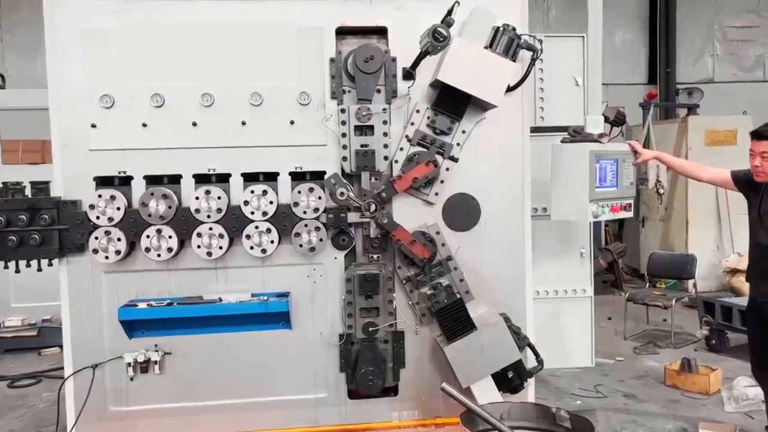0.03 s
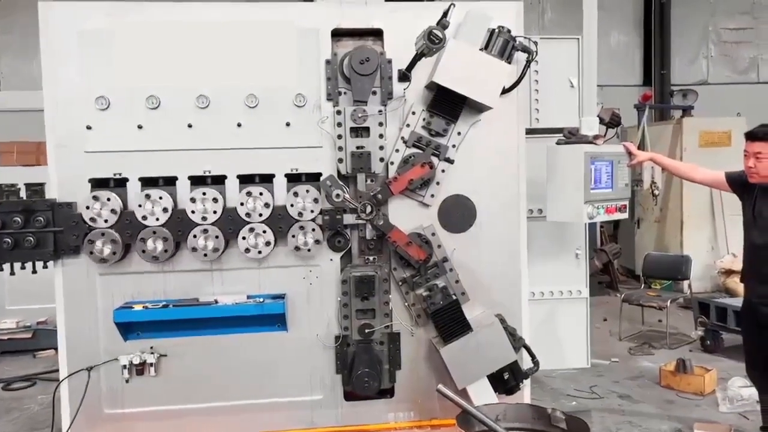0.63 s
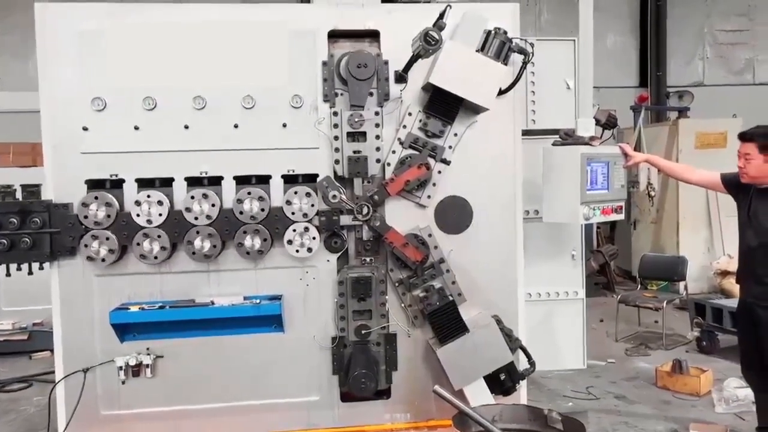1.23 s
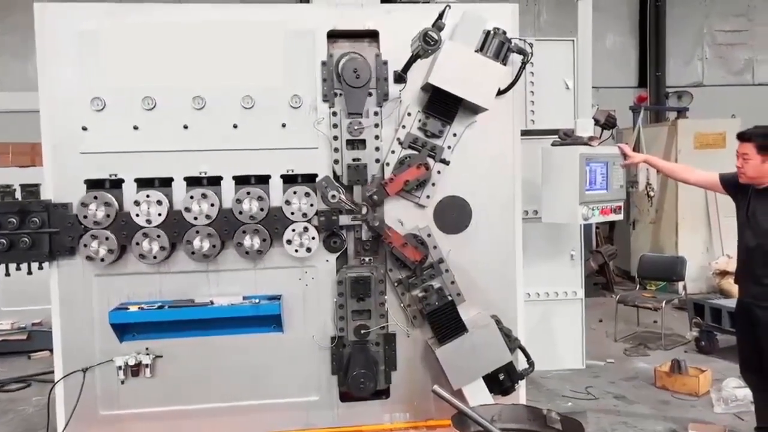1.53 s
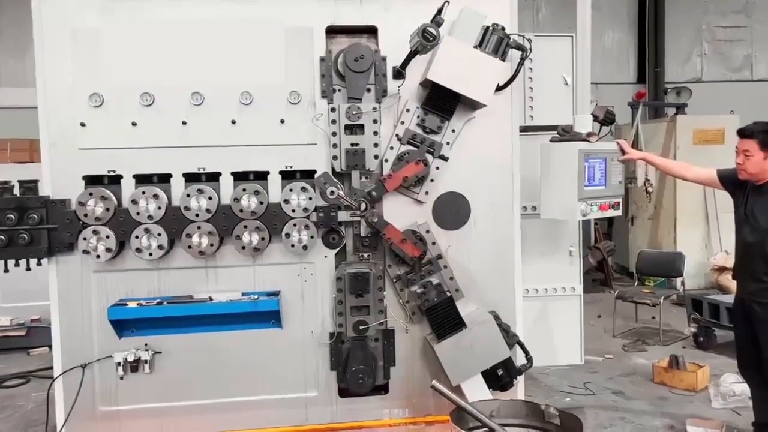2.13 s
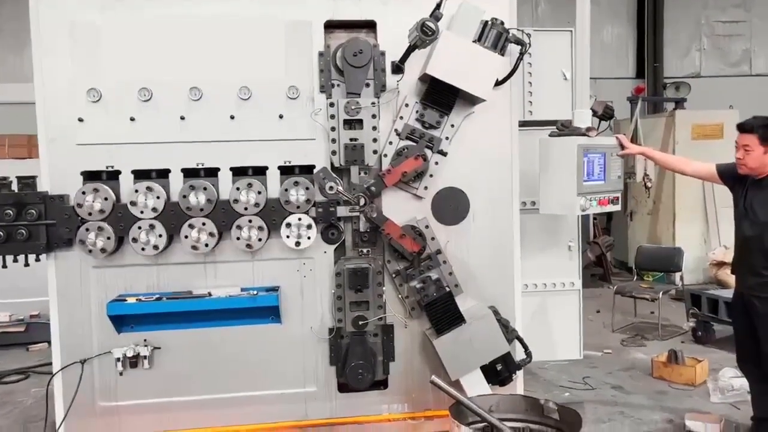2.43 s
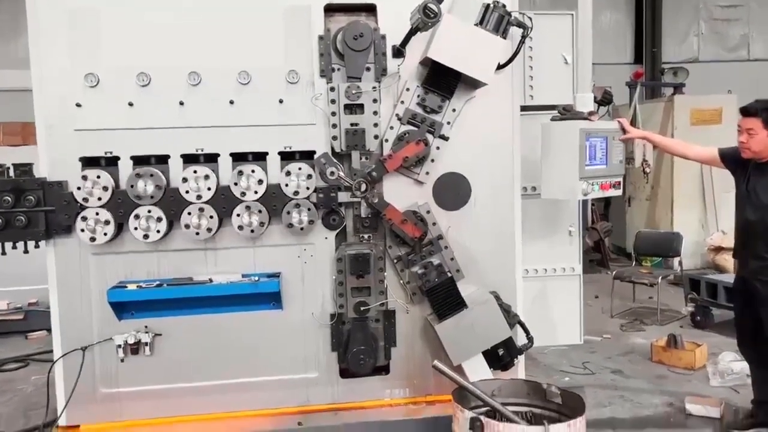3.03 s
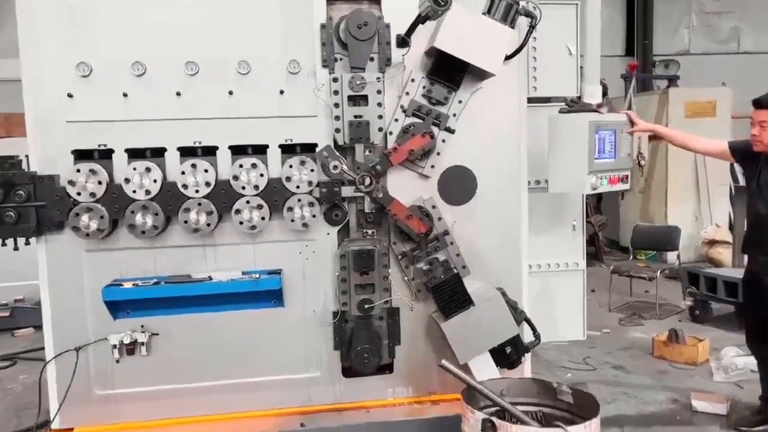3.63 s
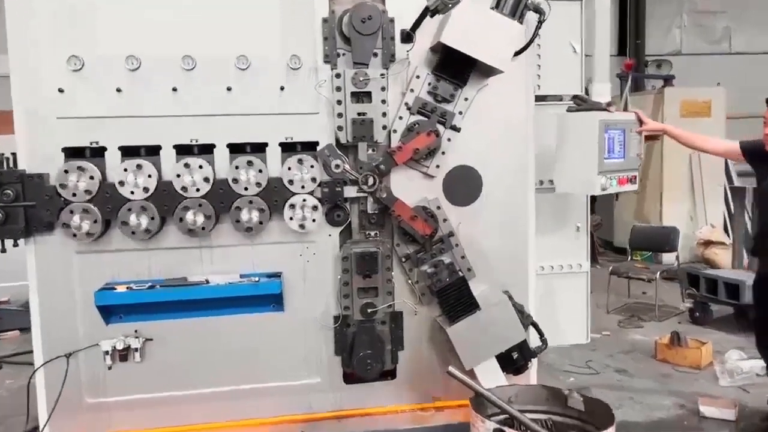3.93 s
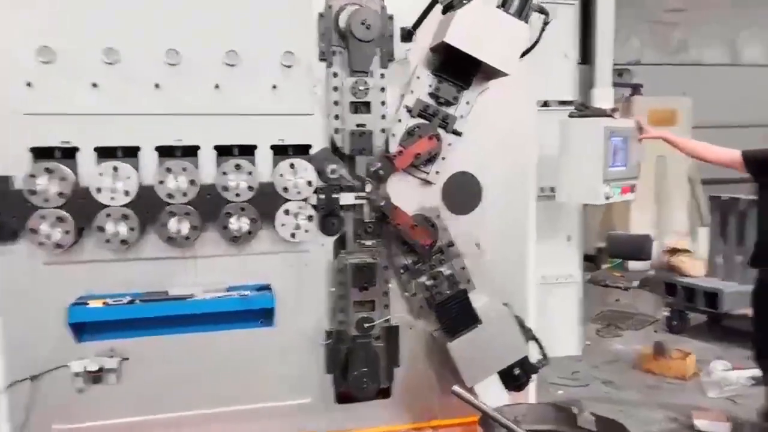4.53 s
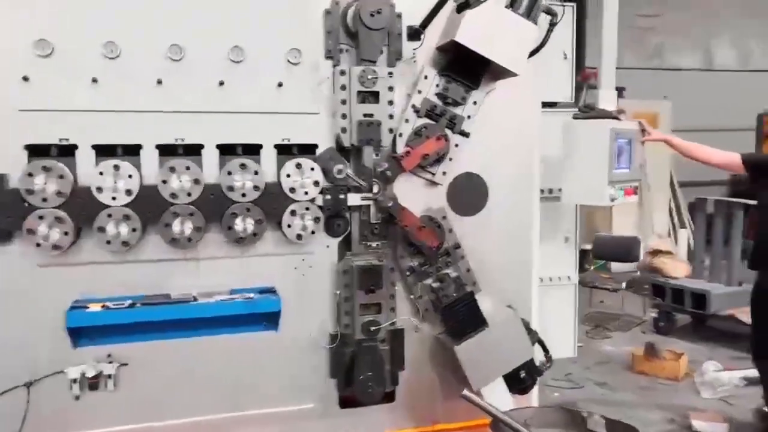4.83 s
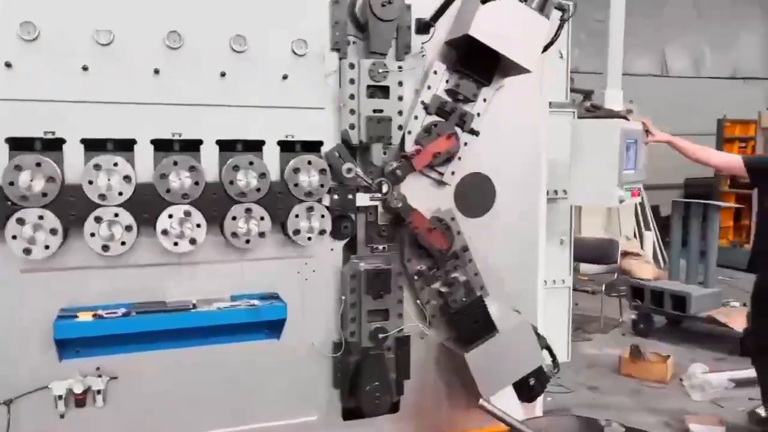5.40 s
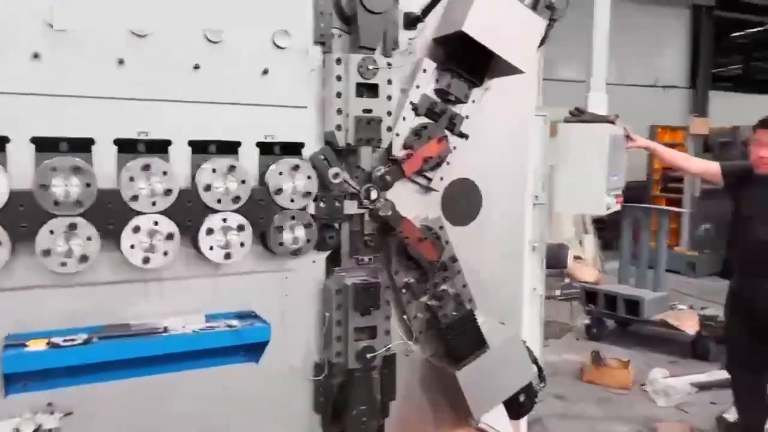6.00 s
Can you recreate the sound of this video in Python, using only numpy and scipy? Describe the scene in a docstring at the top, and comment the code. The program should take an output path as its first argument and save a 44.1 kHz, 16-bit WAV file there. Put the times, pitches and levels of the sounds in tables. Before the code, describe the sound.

A spring coiling machine twice snaps heavy wire with a booming crack, each spring clattering into a steel drum over a low workshop hum.

```python
"""A spring coiling machine cuts off two heavy springs in a large workshop.
In each cycle the rollers feed wire, the cutter runs in, bites the wire and snaps it with a crack that
sets the frame booming. The freed spring drops into a steel drum, where it bounces and rings, each
landing with its own clank. The hall answers every blow; underneath, the drives hum and whistle."""
import sys
import numpy as np
from scipy import signal
from scipy.fft import rfft, irfft
from scipy.io import wavfile
from scipy.ndimage import uniform_filter1d, map_coordinates

SR = 44100
rng = np.random.default_rng(int(sys.argv[2]) if len(sys.argv) > 2 else 0)


def pcm_store(signal):
    """Save signal as 16-bit PCM."""
    levels = np.round(np.clip(np.atleast_2d(signal), -1, 1) * 32767)
    wavfile.write(sys.argv[1], SR, levels.astype(np.int16).T)


N = 276066
T = np.arange(int(1.5 * SR)) / SR  # seconds since a blow

# cutter strokes, with base levels for their layers; lying is how the spring falls (0 on end, 1 on side):
# snap_s, drive_db, bite_db, crack_db, frame_db, lying
STROKES = [(1.4394, -44.5, -22.5, -7.5, -18.5, 0.32), (4.2863, -46, -24, -6.5, -19, 0.89)]
# the machine frame's boom: pitch_hz, t60_s, level_db
FRAME_MODES = [(53.8, 1, -7.5), (70.7, 0.46, 2), (112.1, 0.24, 0), (174.3, 0.13, 5.5), (228.4, 0.3, -18.5),
               (354, 0.15, -10.5)]
# tone colours of the gear whir, the bite, the panels and the high ring that shudders after the snap:
# frequency_hz, level_db
DRIVE_COLOUR = [(70, 10.5), (180, 0.5), (400, 2.5), (900, -2), (1250, 1), (1500, 0), (1700, -8.5),
                (1900, -5), (2500, -8.5), (3500, -16.5), (5000, -26), (11000, -35.5)]
BITE_COLOUR = [(50, -17.5), (240, 8), (600, 5), (1300, 4.5), (1900, -1.5), (2900, -3), (4000, -16.5),
               (8000, -28.5), (12000, -35.5)]
PANEL_COLOUR = [(110, -7), (200, -6.5), (300, 1), (500, 1.5), (800, -5.5), (1200, -4), (1650, -10.5),
                (2400, -7), (3700, -20.5), (7500, -21.5), (12000, -34)]
SHUDDER_COLOUR = [(800, -19), (3000, -1), (4500, 0), (6000, -11.5), (7300, -1.5), (8300, -13.5), (9100, -0.5),
                  (10200, -11), (12000, -21)]
# the spring's landings: start_s, drum_db, spring_db, chatter_s, tilt_db_per_octave, clank_hz, clank_db
LANDINGS = [ (1.862, -14.5, -18, 0.0064, 0.5, 3083, -23.5), (1.877, -16.5, -29, 0.0031, 0, 1400, -34),
            (1.892, -20, -39, 0.013, -1.5, 1520, -32), (1.981, -21, -26.5, 0.013, -1.5, 517, -26),
            (2.032, -20, -27.5, 0.003, -3, 1490, -27.5), (2.084, -25, -20.5, 0.0085, 0.5, 4330, -29),
            (2.101, -34, -25, 0.0022, 3.5, 4210, -26), (2.144, -26, -34, .012, -3.5, 1170, -38.5),
            (2.179, -32.5, -21.5, 0.0045, 0, 4700, -25), (2.246, -40, -30, 0.0039, 3.5, 4650, -42),
            (2.284, -50, -59, 0.0049, -7, 2730, -46), (2.493, -47, -45.5, .004, 0.5, 4800, -45.5),
            (2.527, -53.5, -48.5, 0.0042, -0.5, 3440, -53), (2.582, -48.5, -51, 0.0027, -1, 2110, -53),
            (4.791, -16, -17.5, 0.009, -3, 2870, -27.5), (4.817, -25, -18, 0.0064, 0.5, 7740, -27.5),
            (4.829, -16.5, -20.5, 0.0067, 4, 1323, -22.5), (4.848, -24.5, -25.5, 0.0051, -4.5, 1330, -31.5),
            (4.9, -30.5, -40.5, 0.02, 2.5, 3270, -33), (4.988, -52.5, -44, 0.0039, 4, 3000, -42),
            (5.069, -32, -30.5, 0.0049, -2.5, 2080, -30.5), (5.128, -44.5, -32, 0.0083, -4.5, 4370, -32.5),
            (5.297, -63, -58, 0.0039, -5, 5900, -58)]
# the ring of the spring and of the drum, by how the spring lands: pitch_hz, t60_s, on_end_db, on_side_db
SPRING_MODES = [ (1363, .14, -18, -7), (1966, .12, -18, -10), (2928, .17, -9, -3), (3258, .12, -3, -12),
                (3790, .11, -14, -7), (4032, .15, -7, -10), (4140, .08, -4, -9), (4260, .08, -4, -9),
                (4420, .13, -5, -7), (4550, .1, -6, -16), (4722, .1, -5, -20), (4953, .13, -6, -14),
                (5222, .12, -10, -10), (5526, .15, -8, -25), (5868, .22, -7, -.5), (6330, .15, -7, -16),
                (6646, .13, -8, -12), (7025, .2, -10, -12), (7321, .12, -8, -10), (7434, .12, -8, -9),
                (7530, .2, -8, -3), (7608, .2, -13, -2.5), (7809, .2, -13, -4), (8160, .2, -15, -16),
                (8742, .25, -11, -11), (9065, .25, -11, -8), (9150, .25, -13, -5), (9340, .2, -12, -9),
                (9550, .2, -11, -9), (10020, .09, -12, -12), (10240, .09, -10, -13), (10332, .1, -15, -9),
                (10760, .1, -14, -13), (11520, .12, -12, -9)]
DRUM_MODES = [ (340, .15, -7, -12), (498, .25, -5, -14), (540, .25, -5, -14), (1019, .15, -8, -7),
              (1267, .15, -9, -1), (1320, .08, -7, -3), (1385, .1, -4, -3), (1458, .2, -1, -2),
              (1518, .18, -1, -3), (1562, .2, -1, -7), (1617, .16, -4, -9), (2225, .12, -5, -7),
              (2329, .12, -8, -3), (2474, .2, -5, -2), (2713, .15, -5, -7), (2960, .2, -4, -3),
              (3050, .2, -3, -2), (3140, .2, 0, -5), (3240, .2, 0, -3), (3474, .15, -6, -4)]
# crowds of close modes in the coils and in the drum's sheet steel: frequency_hz, level_db
COIL_COLOUR = [(300, -20.5), (1500, -6.5), (2800, -0.5), (4400, 4.5), (5400, -3), (7300, -1.5), (8400, -16),
               (9200, -8.5), (11500, -9.5), (13000, -33)]
SHEET_COLOUR = [(60, -26), (170, -5.5), (450, -3.5), (800, -2), (1450, 5.5), (1800, -2.5), (2400, 1.5),
                (3300, -0.5), (4800, -12.5), (8000, -15.5), (12000, -20)]
# single modes that a square landing leaves singing: start_s, pitch_hz, t60_s, level_db
SINGING_MODES = [(1.866, 345, 0.091, -22.5), (1.866, 2660, 0.07, -24), (1.890, 520, 0.095, -29.5),
                 (1.865, 1340, 0.048, -21), (2.086, 2988, 0.22, -33), (2.088, 4310, 0.085, -20.5),
                 (2.087, 4953, 0.06, -31), (2.088, 8161, 0.23, -32.5), (2.088, 9140, 0.16, -30.5),
                 (2.181, 3238, 0.1, -33), (2.182, 4600, 0.055, -31), (2.181, 9000, .14, -33),
                 (4.829, 2530, 0.13, -28), (4.835, 1305, 0.055, -20), (4.852, 1375, 0.053, -22.5),
                 (5.072, 1318, .12, -37), (5.073, 2870, 0.21, -39), (5.073, 7750, .22, -35),
                 (5.073, 5860, 0.22, -36), (5.135, 5880, .18, -43)]
# slaps off the roof and walls; the far ones return only bass: delay_s, level_db, cutoff_hz
ECHOES = [(.045, -12.5, 897), (.076, -10.5, 695), (.14, -11.5, 300), (.203, -4.5, 220), (.262, -11.5, 260),
          (0.334, -5.5, 119.5)]
# the room tone of fans and motors: frequency_hz, level_db
SHOP_COLOUR = [(25, -28), (45, -1.5), (75, 2), (130, 0.5), (185, -5), (260, -4), (370, -2.5), (600, -8.5),
               (1100, -16.5), (1700, -21), (3500, -27.5), (7700, -37), (8700, -36.5), (11500, -38.5),
               (12200, -71)]
# wire feeds, whose rollers swell the room tone: peak_s, swell_db
FEEDS = [(.45, 2), (3.42, 0.2), (6.25, 1.5)]
# the drives' hum: pitch_hz, level_db, waver_depth, waver_rate_hz
HUM_TONES = [(91.5, -61, .4, 8), (119, -62, .4, 8), (178.3, -53.5, .2, 6), (280, -67, .4, 8),
             (1055, -72, .5, 10)]
# wire squeaks as each feed ends: start_s, level_db
SQUEAKS = [(.89, -57.5), (3.735, -60)]
# the wire guide's ring: pitch_hz, t60_s, level_db
GUIDE_MODES = [(2630, .02, 1), (3300, .01, -1), (3760, 0.025, 1), (3980, .018, -3), (4090, .018, -2),
               (4400, .01, 1), (5040, .02, -8)]
# faint scrapes elsewhere in the hall: start_s, level_db, centre_hz
SCRAPES = [(.26, -58, 3340), (3.398, -56.5, 3280), (5.911, -63, 4000)]
# the fader curve of the thin whistle: time_s, level_db
WHISTLE_FADER = [(0, -77), (.6, -74.5), (1.07, -76), (1.25, -75), (2.4, -73), (2.67, -78), (2.82, -69.5),
                 (3.06, -67), (3.25, -73.5), (3.8, -71), (4.15, -70), (5.5, -76), (5.78, -73), (6.25, -75)]
# the narrow hiss around the whistle: frequency_hz, level_db
WHISTLE_SKIRT = [(7000, -20), (7600, -4), (8050, 0), (8200, -25), (9000, -50)]

RUN_IN_S, SLIDE_S, BITE_S, TEAR_S = 0.34, 0.265, 0.047, 0.017  # each starts this long before the snap


def cutter():
    """Whir, crunch, snap, then the unloaded frame booms. Returns two stems: body and cracks."""
    body, cracks = np.zeros(N), np.zeros(N)
    frame = ring(FRAME_MODES, count=1, build_cycles=4.2)
    for snap_s, drive_db, bite_db, crack_db, frame_db, _ in STROKES:
        add(body, snap_s - RUN_IN_S, drive_whir(drive_db))
        add(body, snap_s - SLIDE_S, loudest(slide_scrape(), drive_db + 0.5))
        add(body, snap_s - BITE_S, blade_bite(bite_db))
        add(body, snap_s - TEAR_S, loudest(wire_tear(), crack_db - 19.5))
        add(cracks, snap_s, loudest(wire_crack(), crack_db - 7))
        add(body, snap_s + 0.002, loudest(panel_boom(), frame_db - 1.5))
        add(body, snap_s + 0.0088, loudest(plate_thump(), frame_db + 2))
        add(cracks, snap_s, loudest(tool_shudder(), -34.5))
        add(body, snap_s, loudest(frame, frame_db - 3.5))
    return body, cracks


def drive_whir(db, peak_s=0.068, stop_s=0.32):
    """The gears run the cutter in: a grainy whir that swells, sags and fades out after the snap."""
    swell = np.interp(T, [0, peak_s, RUN_IN_S, RUN_IN_S + stop_s], [0.5, 1, 0.38, 0])
    gears = 1.02 * noise(DRIVE_COLOUR) + 0.29 * grainy(DRIVE_COLOUR, per_s=480)
    return undb(db + 2 * walk(69.5)[:len(T)]) * ramp(T, 0.012) * swell * gears


def slide_scrape(length_s=0.056):
    """The cutter's slide drags briefly and unevenly on its ways."""
    drag = ramp(T, 0.01) * bell(T, length_s) * undb(2.6 * walk(60)[:len(T)])
    friction = drag * rng.standard_normal(len(T))
    return convolve(friction, ring([(1506, 0.02, 0), (2500, 0.008, -4)], spread=0.05, count=3))


def blade_bite(db, hold=0.32, settle_s=0.0083, groan_hz=252.4):
    """The blade crunches into the wire and strains the frame, which groans."""
    release = 1 - ramp(T - BITE_S, 0.0104)
    load = ramp(T, 0.0034) * (hold + (1 - hold) * np.exp(-T / settle_s)) * release
    crunch = 0.77 * noise(BITE_COLOUR) + 0.65 * grainy(BITE_COLOUR, per_s=500)
    gain = undb(db + 0.58 * walk(290)[:len(T)])
    groan = ring([(groan_hz, 0.22, 0)], count=1, build_cycles=5.8)
    return gain * load * crunch + loudest(groan, db - 10)


def wire_tear():
    """The tear gathers pace through the wire just before it gives."""
    pace = ramp(T, TEAR_S) ** 2 * (1 - ramp(T - TEAR_S, 0.0026))
    return pace * noise([(500, -17), (3500, 0), (7000, -3), (11000, -26.5)])


def wire_crack(sweep_s=0.00056):
    """The wire parts in a crack that sweeps down; the blade then hits its stop with a duller chop."""
    chirp = sweep(7000, 2200, sweep_s) * (T / sweep_s) ** 2 * fade(0.00295)
    splinters = noise([(200, -12), (1200, -13.5), (3000, -10.5), (6000, 7.5), (12000, 6.5)]) * fade(0.018)
    chop = noise([(200, -8), (800, 1), (2400, -2), (4500, -3.5), (10000, -30.5)])
    chop *= fade(0.029) * fade_in(0.019)
    tick = noise([(1500, -15), (4000, 0), (11000, 0)]) * bell(T - 0.0008, 0.0005)
    return loudest(chirp, 0) + loudest(tick, -9.5) + loudest(splinters, -6) + loudest(chop, -6)


def panel_boom():
    """The snap shakes the panels into a short, dark burst."""
    return band_decay(noise(PANEL_COLOUR), t60_low=0.26, t60_high=0.19) * fade_in(0.032)


def plate_thump(slam_db=6, slam_s=0.013):
    """Slow bending waves cross the front plate: a hard slam, then the lowest arrive and the pitch sinks."""
    swing = (fade(0.46) + undb(slam_db) * bell(T, slam_s)) * ramp(T, 0.0074)
    return unit(sweep(top_hz=240, low_hz=72, sweep_s=0.06) * swing)


def tool_shudder():
    """The snap sets the freed spring ringing high, around 7 and 9 kHz, while loose tooling rattles in small
    ticks that settle."""
    ticks = clicks(per_s=130, spread_db=2.1) * fade(0.65)
    return convolve(ticks, noise(SHUDDER_COLOUR) * fade(0.033))


def falling_springs(tip_lead_s=0.008):
    """Each landing rings drum and spring; how the spring lies decides which modes speak. Some sing on."""
    out = np.zeros(N)
    on_end, on_side = landing_rings(SPRING_MODES, spread=0.0058)
    bottom, wall = landing_rings(DRUM_MODES, spread=0.013)
    size = int(0.4 * SR)
    for start_s, drum_db, spring_db, chatter_s, brightness, clank_hz, clank_db in LANDINGS:
        side = [lying for snap_s, *_, lying in STROKES if snap_s < start_s][-1]
        # every contact point wakes its own crowd of short-lived modes
        coils = unit(noise(COIL_COLOUR, size) * fade(0.14)[:size])
        sheet = unit(noise(SHEET_COLOUR, size) * fade(0.15)[:size])
        spring = coils + undb(2) * tumble(((1 - side) * on_end + side * on_side)[:size])
        drum = sheet + undb(0.5) * ((1 - side) * bottom + side * wall)[:size]
        for response, db in (spring, spring_db), (drum, drum_db):
            contacts = coil_chatter(chatter_s, size) + coil_rattle(size)
            add(out, start_s, loudest(convolve(tilt(contacts, brightness), response), db))
        add(out, start_s, loudest(clank(clank_hz, chatter_s), clank_db))
        # falling on its side, the spring grazes with its tip just before the coils land
        graze = convolve(coil_chatter(tip_lead_s, size), spring)
        add(out, start_s - tip_lead_s, side * loudest(graze, spring_db - 6.5))
    for start_s, hz, t60, db in SINGING_MODES:
        add(out, start_s, loudest(np.sin(2 * np.pi * hz * T) * fade(t60) * ramp(T, 0.0031), db))
    return out


def landing_rings(modes, spread, damping_t60=0.3):
    """A body's short, quickly damped ring for an upright and for a lying spring."""
    upright = [(hz, t60, db) for hz, t60, db, _ in modes]
    lying = [(hz, t60, db) for hz, t60, _, db in modes]
    return [unit(ring(pose, spread, count=7) * fade(damping_t60)) for pose in (upright, lying)]


def tumble(response, detune=0.0011):
    """A tumbling spring's modes shift with each landing and waver as it rocks."""
    positions = np.arange(len(response)) * (1 + detune * rng.standard_normal())
    return blur(map_coordinates(response, [positions], order=3), slip_s=9e-6, rate_hz=150)


def coil_chatter(length_s, size):
    """Coil after coil makes contact: a burst of clicks that builds up and dies down."""
    age = T[:size] / length_s
    return clicks(per_s=1200, spread_db=8, size=size) * age ** 0.72 * np.exp(-age ** 2)


def coil_rattle(size, per_s=200, decay_s=0.041):
    """Loose coils rattle on after a landing in sparse, small contacts."""
    contacts = (rng.random(size) < per_s / SR) * rng.standard_normal(size)
    return undb(-18.5) * contacts * np.exp(-T[:size] / decay_s)


def clank(hz, contact_s, t60=0.064):
    """The few close modes at the point of contact ring out above the rest."""
    return ring([(hz, t60, 0)], spread=0.0399) * ramp(T, contact_s)


def drum_space(falls):
    """The drum's surroundings add a brief, blurred ring to the falls; the hall adds a faint, dull tail."""
    blurred = blur(falls, slip_s=8e-5, rate_hz=320)
    nearby = noise([(100, 12), (700, 4.5), (1400, -2), (3000, 3), (4400, -2), (6000, 1.5),
                    (9500, 1.5), (12000, -12)])
    nearby = band_decay(nearby, t60_low=0.6, t60_high=0.66) * fade_in(0.09)
    tail = hall(filtered(blurred, "low", 3000, order=1), near_db=-32, far_db=-22, far_s=0.096)
    return falls + undb(-12.5) * convolve(blurred, nearby) + tail


def echoes(x):
    """Roof and walls throw back the boom without its treble; the far wall makes it surge again."""
    out = np.zeros(N)
    for delay_s, db, cutoff_hz in ECHOES:
        add(out, delay_s, undb(db) * filtered(x, "low", cutoff_hz))
    return out


def hall(x, near_db, far_db, far_s, low_cut_hz=129):
    """A diffuse tail without deep bass, and a second swell from the far end of the hall."""
    near = band_decay(rng.standard_normal(len(T)), t60_low=2.05, t60_high=1) * fade_in(0.14)
    far = noise([(40, 3), (200, -11), (1000, -9.5), (4000, 0), (12000, -12.5)])
    far = band_decay(far, t60_low=1, t60_high=1) * fade_in(0.087)
    response = undb(near_db) * near + undb(far_db) * np.interp(T - far_s, T, far, left=0)
    return convolve(filtered(x, "high", low_cut_hz), response)


def workshop(feed_width_s=0.65):
    """The bed: fans and motors rumble and swell with each feed, the drives hum, steel rubs faintly."""
    t = np.arange(N) / SR
    swell_db = sum(db * bell(t - peak_s, feed_width_s) for peak_s, db in FEEDS)
    out = noise(SHOP_COLOUR, N) * undb(-49 + swell_db + 0.5 * walk(8))
    # rollers and gears churn unevenly in the mids
    churn = noise([(350, -3), (500, 1.5), (750, -1.5), (1100, 1.5), (1400, -10.5), (2000, -37),
                   (6000, -51.5)], N)
    out += churn * undb(-59 + swell_db + 2.5 * walk(11))
    for hz, db, depth, rate_hz in HUM_TONES:
        phase = 2 * np.pi * hz * t + depth * walk(rate_hz)
        out += np.sqrt(2) * undb(db) * (1 + depth * walk(rate_hz)) * np.sin(phase)
    for start_s, db in SQUEAKS:
        add(out, start_s, loudest(wire_squeak(), db))
    for start_s, db, hz in SCRAPES:
        add(out, start_s, loudest(distant_scrape(hz), db))
    return out


def wire_squeak():
    """The slowing wire catches in its guide, which sings faintly as the rubbing dies away."""
    pressure = ramp(T, 0.033) * bell(T, 0.14)
    return convolve(pressure * rng.standard_normal(len(T)), ring(GUIDE_MODES, count=1))


def distant_scrape(hz):
    """Steel rubs on steel; the hall smears it into a soft swell."""
    hiss = noise([(hz / 4, -12), (hz, 0), (hz * 1.5, -13), (hz * 3, -22)])
    return hiss * fade(0.31) * fade_in(0.082)


def thin_whistle(pitch_hz=8000, jitter_db=1.5):
    """A thin 8 kHz whistle inside a narrow hiss, its level set by a fader curve."""
    t = np.arange(N) / SR
    db = np.interp(t, *np.transpose(WHISTLE_FADER)) + jitter_db * walk(25)
    tone = np.sqrt(2) * np.sin(2 * np.pi * pitch_hz * t + 0.4 * walk(60))
    return undb(db) * (tone + undb(-1) * noise(WHISTLE_SKIRT, N))


def ring(modes, spread=0.0073, count=4, build_cycles=0):
    """A struck body from (pitch_hz, t60_s, level_db) modes, each a cluster of count detuned sines."""
    out = 0
    for hz, t60, db in modes:
        cluster = hz * (1 + spread * rng.uniform(-1.11, 1, (count, 1)))
        wave = np.sin(2 * np.pi * (cluster * T + rng.random((count, 1)))).sum(0)
        # a heavy body takes some cycles to get going, so its lowest modes come last
        swell = 1 - np.exp(-(hz * T / max(build_cycles, 1e-3)) ** 3)
        out = out + undb(db) * unit(wave * fade(t60) * swell)
    return unit(out)


def sweep(top_hz, low_hz, sweep_s):
    """A sine that dives in pitch and levels off."""
    hz = low_hz + (top_hz - low_hz) * np.exp(-T / sweep_s)
    return np.sin(2 * np.pi * np.cumsum(hz) / SR)


def noise(colour, size=len(T)):
    """Noise of rms 1 shaped by (frequency_hz, level_db) points, rolled off below the first."""
    hz, db = np.transpose(colour)
    f = np.fft.rfftfreq(size, 1 / SR) + 1
    gain = undb(np.interp(np.log(f), np.log(hz), db)) * np.minimum(f / hz[0], 1) ** 2
    return unit(irfft(rfft(rng.standard_normal(size)) * gain, size)) * np.sqrt(size)


def clicks(per_s, spread_db, size=len(T)):
    """Randomly timed clicks of uneven strength."""
    hits = (rng.random(size) < per_s / SR) * rng.choice([-1, 1], size)
    return hits * undb(spread_db * rng.standard_normal(size))


def grainy(colour, per_s):
    """Grit of rms 1: many small contacts, each with this tone colour."""
    grains = convolve(clicks(per_s, spread_db=4), rng.standard_normal(len(T)) * fade(0.006))
    hz, db = np.transpose(colour)
    f = np.fft.rfftfreq(len(T), 1 / SR) + 1
    gain = undb(np.interp(np.log(f), np.log(hz), db))
    return unit(irfft(rfft(grains) * gain, len(T))) * np.sqrt(len(T))


def walk(rate_hz):
    """Smooth random drift with a spread of 1."""
    hold = int(SR / rate_hz)
    steps = np.repeat(rng.standard_normal(N // hold + 1), hold)
    drift = uniform_filter1d(uniform_filter1d(steps, hold), hold)[:N]
    return drift / drift.std()


def blur(x, slip_s, rate_hz):
    """Random slips in time smear every tone into a narrow, rough band."""
    return map_coordinates(x, [np.arange(len(x)) + slip_s * SR * walk(rate_hz)[:len(x)]], order=3)


def band_decay(x, t60_low, t60_high):
    """Fade six octave bands, each with its own decay time from bass to treble."""
    octave = np.log2(np.fft.rfftfreq(len(T), 1 / SR) + 1)
    centres = np.log2(SR) - np.arange(7, 1, -1)
    spectrum = rfft(x)
    bands = [irfft(spectrum * np.interp(octave, centres, weights)) for weights in np.eye(6)]
    return unit(sum(band * fade(t60) for band, t60 in zip(bands, np.geomspace(t60_low, t60_high, 6))))


def tilt(x, db_per_octave):
    """Tilt the spectrum: harder contacts are brighter."""
    f = np.fft.rfftfreq(len(x), 1 / SR)
    return irfft(rfft(x) * undb(db_per_octave * np.log2((f + 300) / 3000)), len(x))


def filtered(x, kind, cutoff_hz, order=2):
    """A gentle low-pass or high-pass."""
    return signal.sosfilt(signal.butter(order, cutoff_hz, kind, fs=SR, output="sos"), x)


def convolve(x, response):
    """Drive a response with a signal."""
    return signal.fftconvolve(x, response)[:len(x)]


def fade(t60):
    """Decay by 60 dB in t60 seconds."""
    return np.exp(-np.log(1000) * T / t60)


def fade_in(length_s):
    """A rounded attack."""
    return 1 - fade(length_s)


def ramp(age_s, length_s):
    """A straight rise from 0 to 1."""
    return np.clip(age_s / length_s, 0, 1)


def bell(age_s, width_s):
    """A bell-shaped envelope that peaks at age 0."""
    return np.exp(-(age_s / width_s) ** 2)


def undb(db):
    """Decibels to gain."""
    return 10 ** (np.asarray(db) / 20)


def unit(x):
    """Scale to unit energy."""
    return x / np.sqrt(np.sum(x ** 2))


def loudest(x, db):
    """Set the loudest 7 ms to this rms level."""
    return x * undb(db) / np.sqrt(uniform_filter1d(x ** 2, 300).max())


def add(out, start_s, x):
    """Mix a sound in at a time."""
    i = int(start_s * SR)
    out[i:i + len(x)] += x[:N - i]


def scene():
    """The frame shakes the whole hall; the small crack and the drum sit closer and drier."""
    body, cracks = cutter()
    rear, rear_cracks = cutter()  # the machine's back radiates its own sound into the hall
    falls = falling_springs()
    machine = body + cracks + echoes(body) + hall(body, near_db=-6.5, far_db=-18, far_s=0.23)
    machine += hall(rear + undb(-18.5) * rear_cracks, near_db=-6.5, far_db=-12, far_s=0.17)
    return (machine + drum_space(falls) + workshop() + thin_whistle())[None]


def record(dry, top_hz=11850):
    """The microphone rounds the highest peaks and cuts the top."""
    return signal.sosfilt(signal.ellip(8, 0.2, 70, top_hz, fs=SR, output="sos"), np.tanh(dry))


dry = scene()
out = record(dry)
pcm_store(out)
```